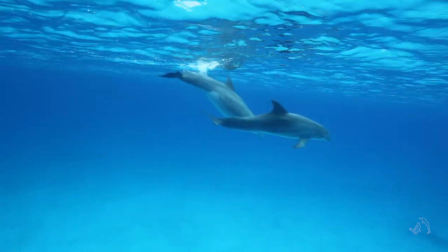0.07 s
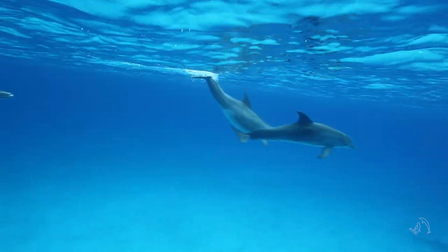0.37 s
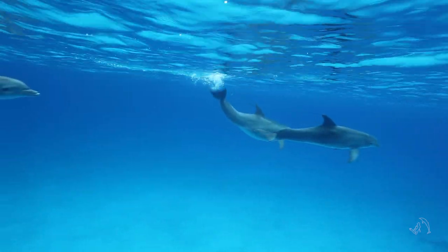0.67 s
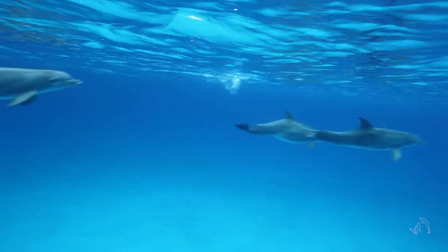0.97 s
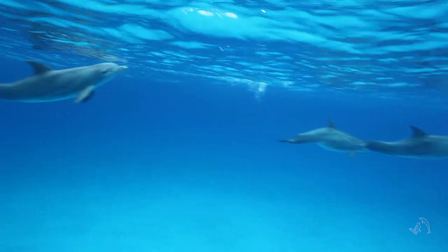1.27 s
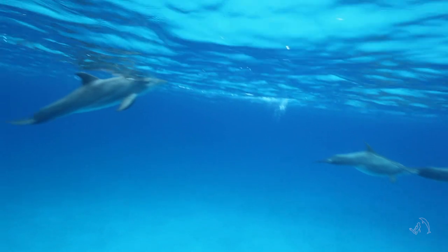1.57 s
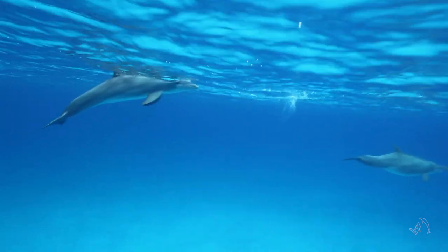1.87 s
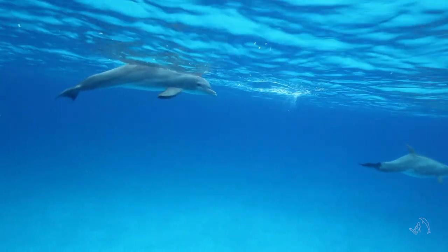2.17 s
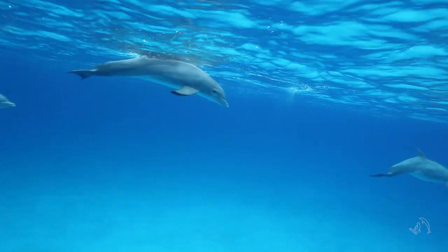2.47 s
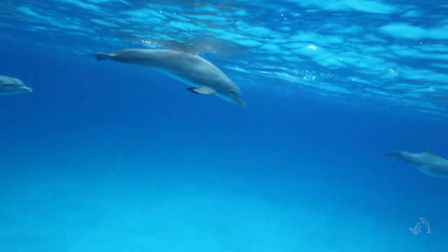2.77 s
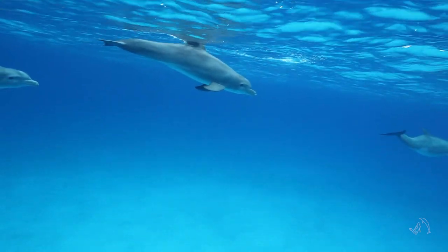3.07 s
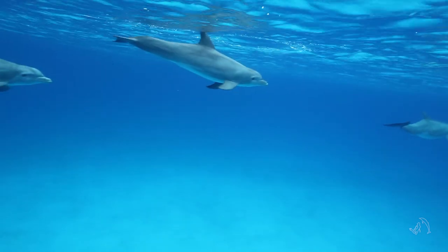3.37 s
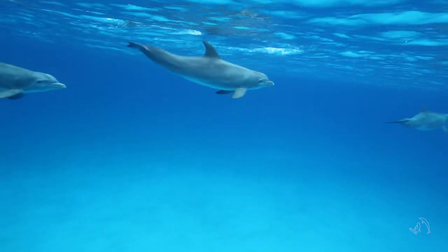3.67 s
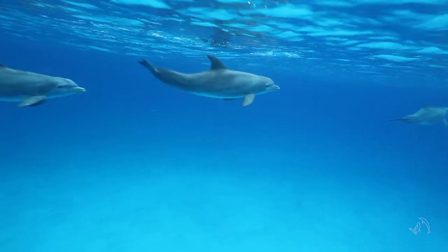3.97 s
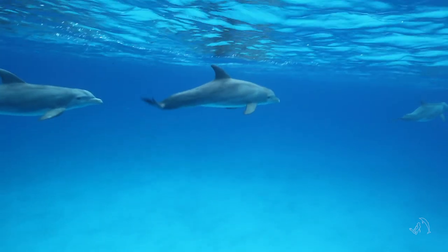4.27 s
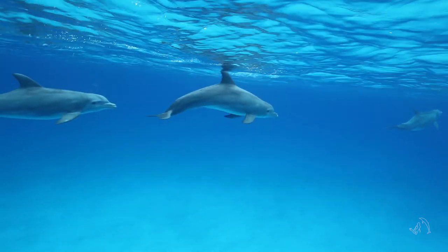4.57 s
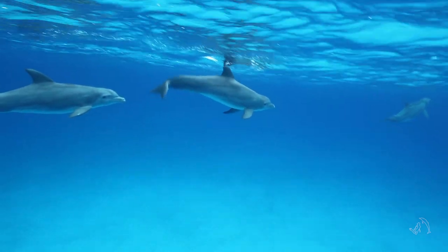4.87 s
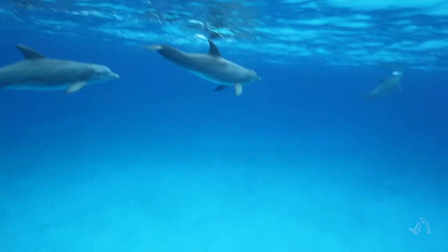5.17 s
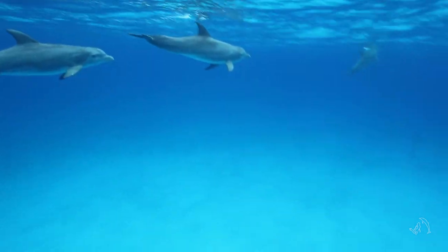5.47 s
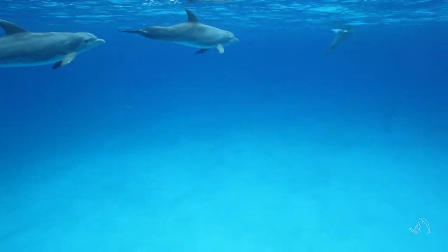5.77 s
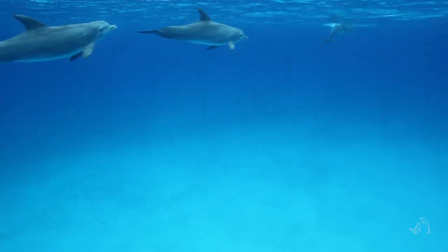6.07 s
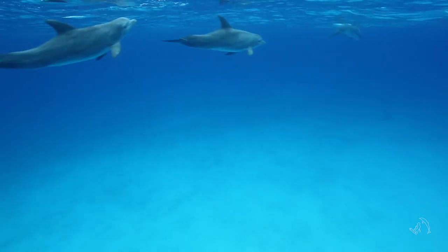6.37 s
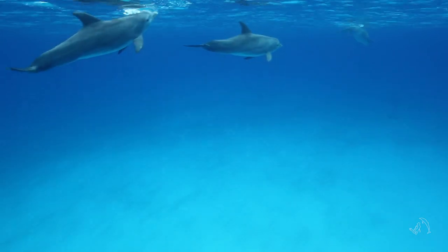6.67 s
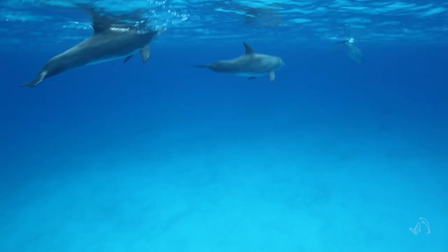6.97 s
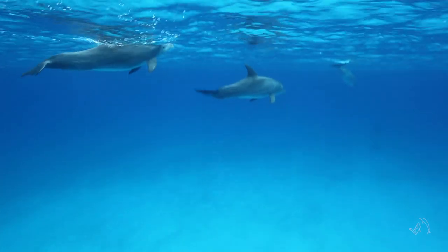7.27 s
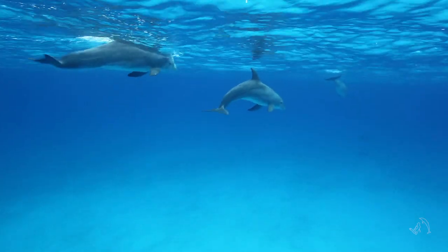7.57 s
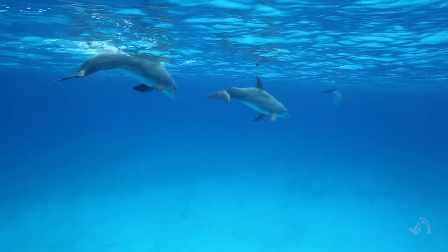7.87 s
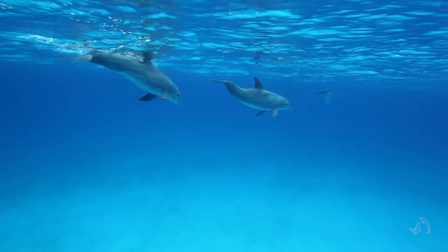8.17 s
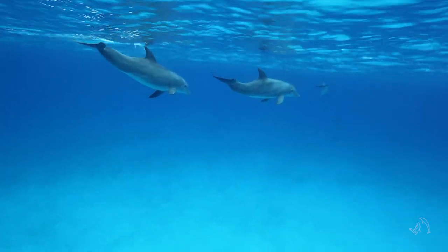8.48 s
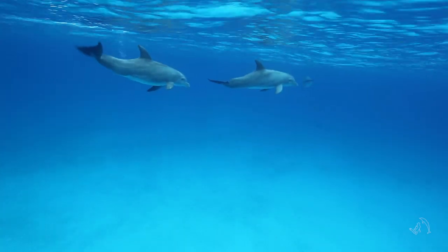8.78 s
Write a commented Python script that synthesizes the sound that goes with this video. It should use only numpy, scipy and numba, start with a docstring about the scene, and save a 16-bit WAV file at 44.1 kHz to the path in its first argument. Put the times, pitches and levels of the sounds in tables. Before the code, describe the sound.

Dolphins send trains of sharp clicks and a faint buzz over a steady underwater hiss, with small snaps, bubbles and two loud cracks.

```python
"""A steady underwater hiss, a far buzz and a faint falling whistle, with sharp dolphin clicks close by.
One microphone is held under water in a shallow, sandy sea as the animals swim past. Near dolphins send
trains of echolocation clicks, others buzz and tick further off; one clicks so fast that it squeals.
Bubbles ring, small snaps and two loud cracks stand out, and waves and sand throw back short tails.
The sound is mono."""
import sys
import numpy as np
from scipy import signal
from scipy.fft import rfft, irfft
from scipy.io import wavfile
from scipy.ndimage import uniform_filter1d
from numba import njit

SR = 44100
rng = np.random.default_rng(int(sys.argv[2]) if len(sys.argv) > 2 else 0)


def transcribe(signal):
    """Save signal, clipped to [-1, 1], as a 16-bit WAV file at the path in sys.argv[1]."""
    frames = np.atleast_2d(signal).T
    limited = np.clip(frames, -1, 1)
    pcm = np.round(limited * 32767).astype(np.int16)
    wavfile.write(sys.argv[1], SR, pcm)


N = 392931
TIME = np.arange(N) / SR
TOP_HZ = 15800  # upper edge of the sound


def undb(db):
    """Decibels to gain."""
    return 10 ** (np.asarray(db) / 20)


def unit(x):
    """Scale to rms 1."""
    return x / np.sqrt(np.mean(x ** 2))


def curves(rows):
    """Each column after the first as a line through time."""
    times, *columns = np.transpose(rows)
    return [np.interp(TIME, times, column) for column in columns]


def during(rows):
    """True between a table's first and last row."""
    return (TIME >= rows[0][0]) & (TIME <= rows[-1][0])


def add(out, start, x):
    """Mix x into out from start, in seconds."""
    i = max(int(start * SR), 0)
    out[i:i + len(x)] += x[:max(len(out) - i, 0)]


def fade(t60):
    """An exponential decay, 4096 samples long, that loses 60 dB in t60 seconds."""
    return np.exp(-np.log(1000) * TIME[:4096] / t60)


def colour_db(colour, hz):
    """A spectrum's level at given frequencies."""
    knots_hz, db = np.transpose(colour)
    return np.interp(np.log(hz + 1), np.log(knots_hz), db)


def resonate(x, hz, width_hz):
    """Two-pole resonance, gain 1 at its centre."""
    return signal.lfilter(*signal.iirpeak(hz, hz / width_hz, fs=SR), x)


@njit
def moving_resonance(x, hz, width_hz):
    """State-variable band-pass whose centre moves every sample."""
    y, band, low = np.empty(len(x)), 0., 0.
    for i in range(len(x)):
        g, damping = np.tan(np.pi * hz[i] / SR), width_hz / hz[i]
        v = (band + g * (x[i] + 1e-18 - low)) / (1 + g * (g + damping))
        band, low, y[i] = 2 * v - band, low + 2 * g * v, damping * v
    return y


def scatter(x, wet_db, t60):
    """Waves and sand throw back a short diffuse tail that changes as the surface moves."""
    tails = [fade(t60) * rng.standard_normal(4096) for _ in range(2)]
    first, second = (signal.fftconvolve(x, tail / np.linalg.norm(tail))[:N] for tail in tails)
    swell = 2 * np.pi * 2.7 * TIME
    return x + undb(wet_db) * (np.cos(swell) * first + np.sin(swell) * second)


def smear(pulses, t60):
    """Many echo paths turn each impulse into its own dying burst of noise."""
    return signal.fftconvolve(pulses, fade(t60))[:N] * rng.standard_normal(N)


def click_shape(colour, tilt_db=0, chirp_s=0, size=512):
    """One click, its treble tilted by tilt_db an octave above 6 kHz and chirp_s late at TOP_HZ."""
    hz = np.fft.rfftfreq(size, 1 / SR)
    db = colour_db(colour, hz) + tilt_db * np.log2(np.maximum(hz, 6000) / 6000)
    cepstrum = irfft(np.log(undb(db)))
    cepstrum[1:size // 2] *= 2  # folded to minimum phase for a sudden onset
    cepstrum[size // 2 + 1:] = 0
    pulse = irfft(np.exp(rfft(cepstrum) - 1j * np.pi * chirp_s * hz ** 2 / TOP_HZ))
    return pulse * np.sqrt(SR / 1000) / np.linalg.norm(pulse)  # the energy of 1 ms at rms 1


def click_times(rate_rows):
    """The moments of a train's clicks: one at its start, then one per cycle of the moving rate."""
    rate, = curves(rate_rows)
    cycles = np.ceil(np.cumsum(rate * during(rate_rows)) / SR)
    return TIME[np.diff(cycles, prepend=0) > 0]


def impulses(rate_rows, level_rows, uneven_db=1.5):
    """One impulse per click, following a level curve, each a little stronger or weaker."""
    at = np.searchsorted(TIME, click_times(rate_rows))
    db, = curves(level_rows)
    out = np.zeros(N)
    out[at] = undb(db[at] + uneven_db * rng.standard_normal(N)[:len(at)])
    return out


def strays(per_s, db, spread_db=2, low_hz=3700, high_hz=7500):
    """Faint chance events: (time [s], level [dB], frequency [Hz])."""
    wait, weakness, pitch = rng.random((40, 3)).T
    times = np.cumsum(-np.log(1 - wait)) / per_s
    hz = low_hz * (high_hz / low_hz) ** pitch
    return list(zip(times, db - spread_db * (2 * weakness - 1), hz))


def sea():
    """Steady hiss all round the microphone, with a faint crackle of distant shrimp."""
    # spectrum of the hiss (frequency [Hz], relative level [dB])
    colour = [(12, -37), (20, -4), (144, -2), (259, -3), (333, -3.5), (519, -4.5), (746, -6), (811, -6),
              (958, -7), (1040, -7.5), (2470, -9.5), (4190, -9), (7110, -10), (7950, -11), (15500, -15)]
    # its humps and one dip (centre [Hz], width [Hz], lift [dB])
    humps = [(3970, 610, 2), (5620, 1200, -1.5), (7750, 1100, 2)]
    hz = np.fft.rfftfreq(N, 1 / SR)
    db = colour_db(colour, hz)
    db += sum(lift * np.exp(-(2 * (hz - centre) / width) ** 2) for centre, width, lift in humps)
    db += 20 * np.log10((hz + 1) / np.hypot(hz, 30))  # the microphone drops the deepest bass
    hiss = irfft(rfft(rng.standard_normal(N)) * undb(db) * (hz < TOP_HZ), N)
    shrimp = rng.random(N) < 60 / SR  # about 60 a second
    grains = shrimp * undb(3.3 * np.minimum(rng.exponential(size=N), 3))
    crackle = scatter(resonate(resonate(grains, 4100, 4400), 5000, 5600), wet_db=0, t60=.016)
    return undb(-49.5) * unit(hiss) + undb(-60) * unit(crackle)


def buzz():
    """Fast clicks, far off and off the beam, ring two resonances; the upper shifts as the animal turns."""
    # pace (time [s], rate [clicks/s])
    rate = [(0, 126), (.6, 146), (1.25, 118), (1.75, 138), (2.13, 192), (2.7, 186), (3.1, 104), (4.9, 105)]
    # strength of the lower resonance (time [s], level [dB])
    level = [(0, -65), (.3, -59), (.95, -59), (1.2, -62), (1.33, -57), (1.55, -58.5), (2.27, -54.5),
             (2.6, -57.5), (2.95, -56.5), (3.55, -57.5), (3.88, -62), (3.97, -55), (4.15, -60),
             (4.9, -59.5)]
    # upper resonance (time [s], level over the lower [dB], centre [Hz])
    turning = [(0, 3.5, 7600), (.6, -1, 8350), (1.28, -3.5, 8240), (1.55, 2.5, 8850), (2.15, 1, 8060),
               (2.57, -2, 8260), (2.9, 3, 7910), (3.5, -5, 7840), (4.05, -1, 7840), (4.9, -3, 7700)]
    db, = curves(level)
    upper_db, upper_hz = curves(turning)
    pulses = impulses(rate, [(0, 0)])
    # echoes off the moving surface blur the gaps between clicks
    blurred = unit(pulses) + undb(2.5) * unit(smear(pulses, t60=.021))
    lower = resonate(resonate(resonate(blurred, 3930, 800), 5000, 1400), 4370, 1800)
    upper = moving_resonance(blurred, upper_hz, width_hz=2000.)
    upper = moving_resonance(upper, upper_hz, width_hz=2400.)  # steepens the skirts
    return undb(db) * (unit(lower) + undb(upper_db) * unit(upper))


def whistle():
    """A distant pure tone that glides down, blurred by its echoes."""
    # the fall (time [s], pitch [Hz], level [dB])
    glide = [(0, 7380, -55), (.08, 7030, -56), (.16, 6460, -61), (.27, 6200, -68)]
    hz, db = curves(glide)
    tone = during(glide) * undb(db) * np.sin(2 * np.pi * np.cumsum(hz) / SR)
    return scatter(tone, wet_db=-3, t60=.05)


def near_sweeps():
    """Sharp clicks close to the microphone; their rate follows the range to what the dolphin inspects."""
    # pace of a fast sweep and a slower one (time [s], rate [clicks/s])
    fast_rate = [(.0059, 88.09), (.555, 99.91), (.81, 92.91)]
    slow_rate = [(1.6894, 45.16), (1.85, 50.61), (2.149, 39.57), (2.229, 31.49), (2.69, 34.21),
                 (2.882, 41.29), (3.255, 36.9), (3.37, 17.55)]
    # their strength (time [s], level [dB])
    fast_level = [(0, -41.5), (.45, -43.5), (.81, -47)]
    slow_level = [(1.69, -46), (1.86, -40), (2.55, -41.5), (3.15, -39), (3.37, -46)]
    # spectrum of a near click (frequency [Hz], relative level [dB])
    colour = [(1500, -39), (3000, -26), (4200, 5.5), (5500, -10), (7000, 2), (8200, 0.5), (9600, -4.5),
              (11000, -1), (13000, -7), (15500, -22)]
    pulses = impulses(fast_rate, fast_level) + impulses(slow_rate, slow_level)
    clicks = signal.fftconvolve(pulses, click_shape(colour, chirp_s=.0001))[:N]
    return scatter(clicks, wet_db=-8, t60=.014)


def bubbles():
    """Each bubble rings for a moment, small ones more briefly, and rises slightly in pitch."""
    # bubbles that stand out (time [s], level [dB], pitch [Hz])
    clear = [(.151, -31, 3170), (.795, -29, 8200), (1.436, -32, 3870), (1.855, -31, 7320),
             (3.266, -23.5, 4580), (3.452, -32.5, 3430), (5.035, -27, 3680), (6.2997, -18.5, 7400),
             (6.444, -30.5, 3640), (7.0742, -28, 2810), (7.0862, -16, 7640), (7.0886, -16, 8180),
             (7.093, -21, 4180), (7.657, -32.5, 3770), (8.352, -26, 7600)]
    out = np.zeros(N)
    for start, db, hz in list(clear) + strays(per_s=1.6, db=-37):
        t60 = 43 / hz  # dies away in 43 cycles
        envelope = fade(t60) * (1 - fade(.0015))
        t = TIME[:len(envelope)]
        rise = 1 + .005 * np.minimum(t / t60, 1)
        add(out, start, undb(db) * envelope * np.sin(2 * np.pi * hz * t * rise))
    return scatter(out, wet_db=-10, t60=.02)


def snaps():
    """Small snaps and splashes: short broad bursts of noise with no bass."""
    # snaps that stand out (time [s], level [dB], centre [Hz], t60 [s])
    clear = [(.574, -31, 6450, 0.0085), (.923, -32, 4950, 0.013), (1.040, -26.5, 4600, .008),
             (1.1251, -35, 8500, .005), (1.455, -29.5, 7000, .025), (1.9375, -33, 7500, .0041),
             (3.2655, -27, 5470, 0.014), (5.005, -29, 4150, 0.033), (5.0275, -30, 5500, .009),
             (5.370, -36.5, 4100, .11), (6.344, -31, 6500, .014), (6.646, -31, 4700, .035),
             (6.925, -32.5, 3880, 0.016), (7.0762, -23, 6800, .004), (7.08, -35, 4600, .03),
             (7.195, -28.5, 5170, .02), (7.563, -30, 4660, 0.0054), (8.205, -33.5, 5000, .025),
             (8.358, -34, 4530, .012)]
    faint = [(*row, .014) for row in strays(per_s=1.5, db=-35)]
    out = np.zeros(N)
    for start, db, hz, t60 in list(clear) + faint:
        decay = fade(t60)
        noise = decay * rng.standard_normal(len(decay))
        burst = resonate(resonate(noise, hz, .69 * hz), hz, hz)
        add(out, start, undb(db) * burst / np.abs(burst).max())
    out = signal.sosfilt(signal.butter(4, 3100, "high", fs=SR, output="sos"), out)
    return scatter(out, wet_db=-7, t60=.03)


def squeal():
    """Clicks so fast that they fuse into harmonics; a moving head resonance picks out the strongest."""
    # pace (time [s], rate [clicks/s])
    pace = [(2.16, 552), (2.225, 526), (2.253, 546), (2.295, 522), (2.35, 523), (2.359, 533), (2.405, 540),
            (2.432, 560)]
    # two swells (time [s], head resonance [Hz], level [dB], low resonance against the head's [dB])
    swells = [(2.16, 6370, -51, -20), (2.22, 6260, -49, -12), (2.255, 6440, -41.5, -2),
              (2.3, 6400, -43.5, 5), (2.35, 6650, -48, 1), (2.36, 5940, -39.5, -20),
              (2.405, 6080, -39, -15), (2.432, 6300, -55, -14)]
    on = during(pace)
    rate, head_hz, db, low_db = (curve[on] for curve in curves(pace) + curves(swells))
    waver = .0037 * unit(uniform_filter1d(rng.standard_normal(len(rate)), size=80))
    phase = 2 * np.pi * np.cumsum(rate * (1 + waver)) / SR
    harmonics = np.arange(6, 23)[:, None]
    hz = harmonics * rate
    head = 1 / (1 + ((hz - head_hz) / 370) ** 4)
    low = undb(low_db) / (1 + ((hz - 4250) / 250) ** 2)
    skirt = undb(-9) / (1 + ((hz - 8100) / 1200) ** 4)
    gains = head + low + skirt
    out = np.zeros(N)
    out[on] = undb(db) * np.sum(gains * np.sin(harmonics * phase), axis=0) / np.linalg.norm(gains, axis=0)
    return out


def scanning_clicks(uneven_db=1.3):
    """Near click trains; as the beam leaves the microphone, clicks dull and stretch into tiny chirps."""
    # a slow scan, a dull flurry between the cracks, a burst that speeds up and slows
    # their pace (time [s], rate [clicks/s])
    scan_rate = [(3.788, 38.157), (3.9571, 24.383), (4.3017, 27.838), (4.6672, 26.776), (4.851, 24.8),
                 (4.856, 45), (4.905, 37)]
    flurry_rate = [(4.9435, 190), (4.952, 130), (4.977, 98)]
    burst_rate = [(5.9386, 43.99), (6.0122, 33.36), (6.0883, 81.96), (6.1267, 91.73), (6.206, 35.4),
                  (6.215, 12), (6.235, 12)]
    # their beams at the microphone (time [s], level [dB], treble tilt [dB/octave])
    scan_beam = [(3.79, -43, -2), (4.08, -37, -2), (4.23, -39.5, -3), (4.38, -38.5, -1.5),
                 (4.82, -39, -4.5), (4.9, -36, -8)]
    flurry_beam = [(4.94, -40, -24), (4.98, -39, -12)]
    burst_beam = [(5.94, -43, 2), (6.06, -35, 3), (6.12, -38, -1), (6.185, -33, -15), (6.23, -35.5, -23)]
    # spectrum of a click before the tilt (frequency [Hz], relative level [dB])
    colour = [(1500, -33), (3000, -28), (3800, 4.5), (4700, -3.5), (5300, -8), (6000, 2.5), (6800, -1),
              (7600, 0), (9700, -1.5), (11200, -6), (12200, -14.5), (15500, -23)]
    out = np.zeros(N)
    for rate, beam in ((scan_rate, scan_beam), (flurry_rate, flurry_beam), (burst_rate, burst_beam)):
        times, level_db, treble_db = np.transpose(beam)
        for start in click_times(rate):
            db = np.interp(start, times, level_db) + uneven_db * rng.standard_normal()
            tilt_db = np.interp(start, times, treble_db)
            chirp_s = .0005 + .00006 * max(-tilt_db, 0)
            add(out, start, undb(db) * click_shape(colour, tilt_db, chirp_s))
    return scatter(out, wet_db=-5.5, t60=.047)


def cracks():
    """Two loud ringing pulses; the surface mirrors each, upside down, a few milliseconds later."""
    # the pulses (time [s], level [dB], echo lag [s], echo gain [dB], lift of modes under 4 kHz [dB])
    hits = [(4.9268, -13.5, .0039, -4, -6.5), (4.9815, -11, .0035, -3.5, 1)]
    # what a crack rings with (frequency [Hz], relative level [dB], t60 [s])
    modes = [(2670, -9.5, 0.0053), (3750, 1, 0.0088), (4320, -8, 0.009), (4850, -2.5, 0.0045),
             (5360, -7, 0.008), (6100, -4.5, 0.005), (6950, -8, 0.0044), (8120, 4, 0.0031),
             (9600, -16, 0.0043), (11800, -14, .003)]
    attack = 1 - fade(.003)
    t = TIME[:len(attack)]
    out = np.zeros(N)
    for start, db, lag, echo_db, low_db in hits:
        ring = 0
        for hz, mode_db, t60 in modes:
            decay = fade(t60) * undb(mode_db + low_db * (hz < 4000))
            ring += decay * np.sin(2 * np.pi * (hz * t + rng.random()))
        crack = ring * attack * undb(db)
        add(out, start, crack)
        add(out, start + lag, -undb(echo_db) * crack)
    return scatter(out, wet_db=-10, t60=.059)


def far_ticks():
    """A distant dolphin's slow clicks come by many paths: dull, smeared and never twice alike."""
    # pace (time [s], rate [clicks/s])
    rate = [(5.07, 19.17), (5.95, 18.8), (7.9, 18.8)]
    # strength before smearing (time [s], level [dB])
    level = [(5.07, -64.5), (6.45, -58.5), (7.65, -61.5), (7.9, -70)]
    # spectrum of a far click (frequency [Hz], relative level [dB])
    colour = [(1500, -48), (2800, -1), (3600, 11.5), (4700, 6), (5800, -17), (7500, 5), (10000, -19),
              (15000, -24)]
    bursts = smear(impulses(rate, level), t60=.027)
    return signal.fftconvolve(bursts, click_shape(colour))[:N]


def scene():
    """Everything reaches one sealed microphone, the same on both channels."""
    dolphins = near_sweeps() + scanning_clicks() + far_ticks() + buzz() + squeal() + whistle()
    mono = dolphins + cracks() + snaps() + bubbles() + sea()
    return np.array([mono, mono])


def record(dry, threshold=.11, release_s=.295):
    """The recorder's gain control ducks a little after loud peaks and recovers slowly; the top is cut."""
    excess = np.maximum(np.abs(dry[0]) - threshold, 1e-9)
    release = TIME / release_s
    held = np.exp(np.maximum.accumulate(np.log(excess) + release) - release)  # decaying peak hold
    duck = signal.lfilter([1 / 400], [1, 1 / 400 - 1], held)  # 9 ms attack
    ducked = dry / (1 + 1.4 * duck)
    return signal.sosfilt(signal.ellip(10, .1, 70, TOP_HZ, fs=SR, output="sos"), ducked)


dry = scene()
out = record(dry)
transcribe(out)
```